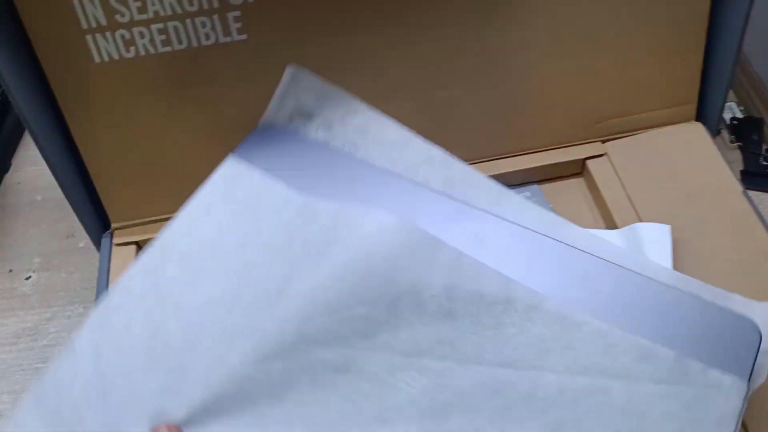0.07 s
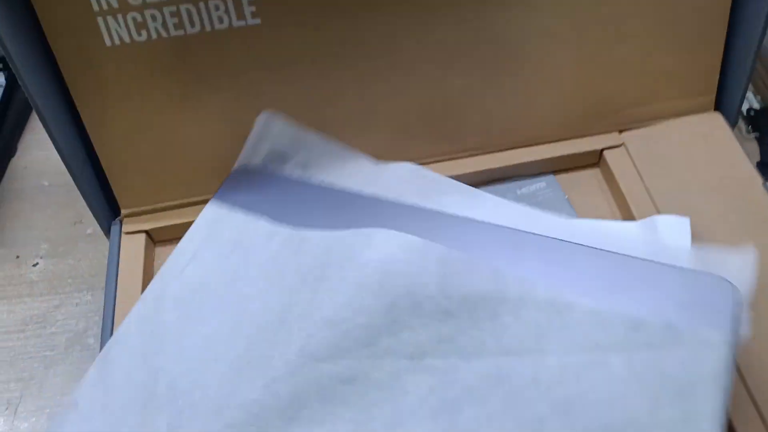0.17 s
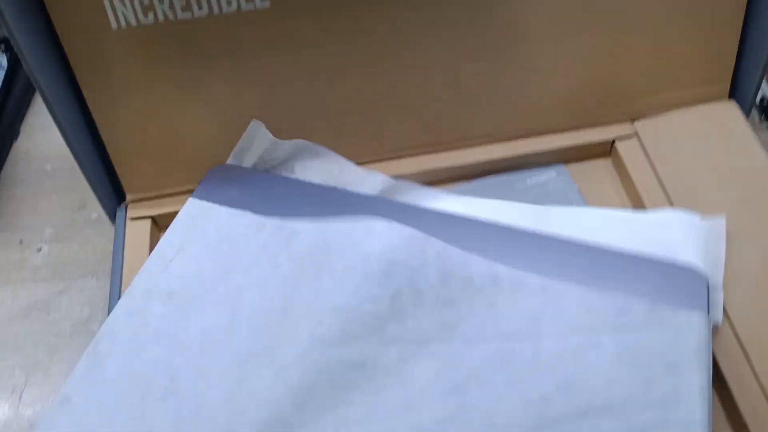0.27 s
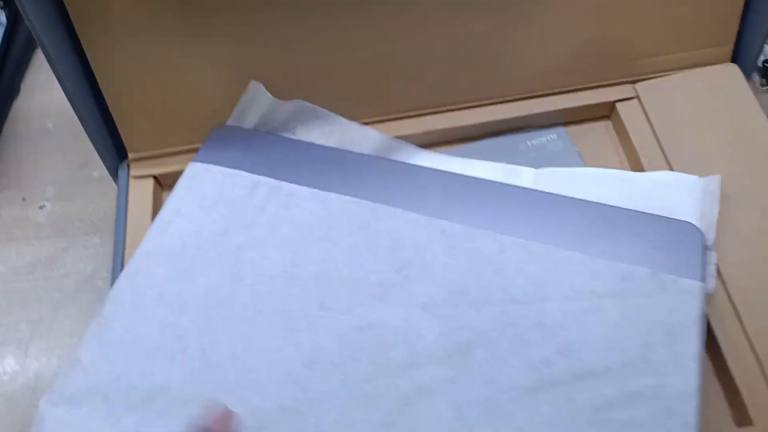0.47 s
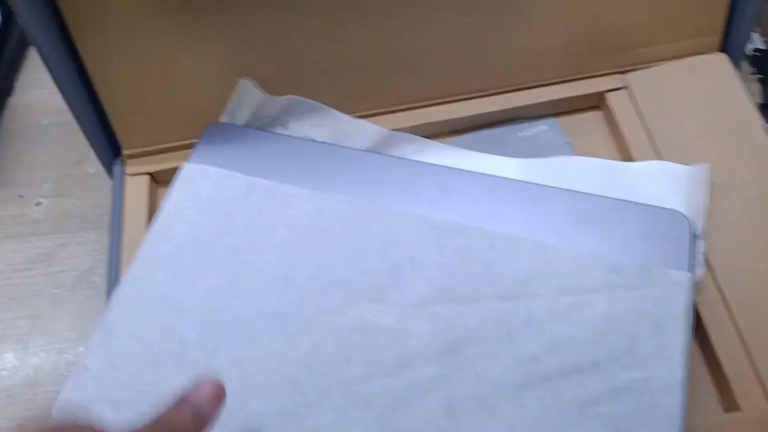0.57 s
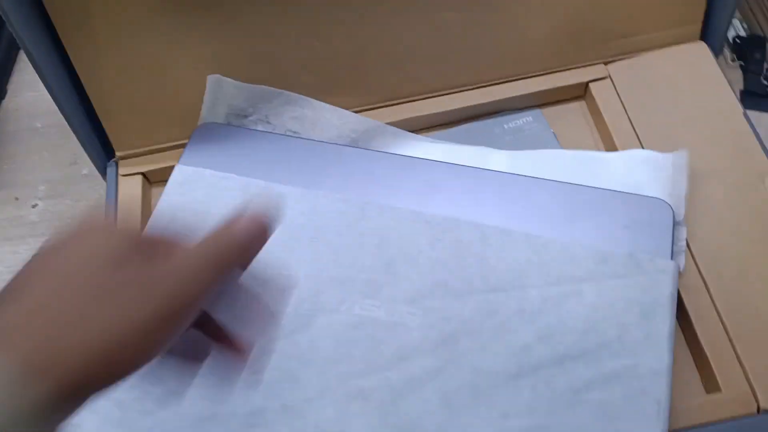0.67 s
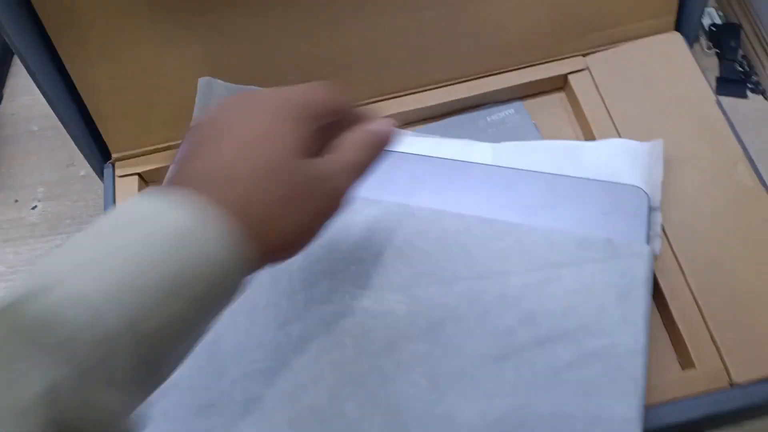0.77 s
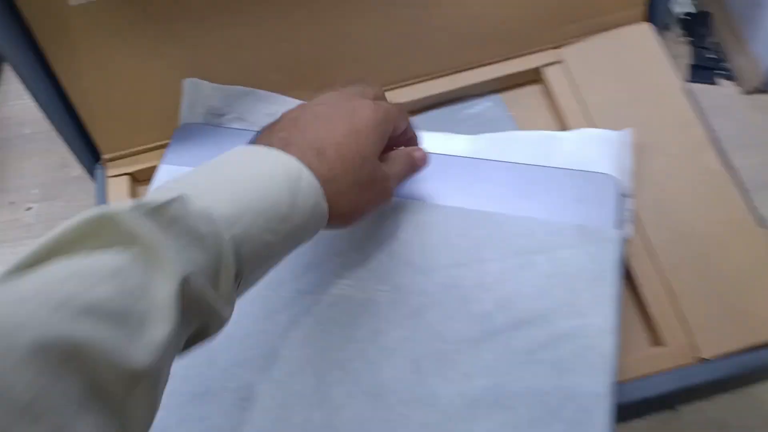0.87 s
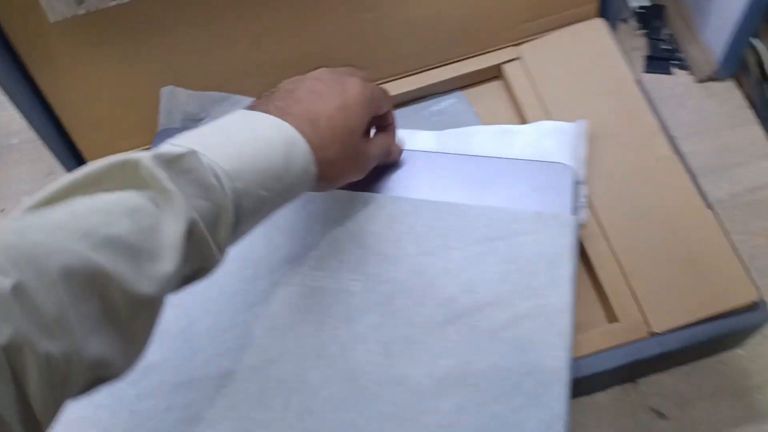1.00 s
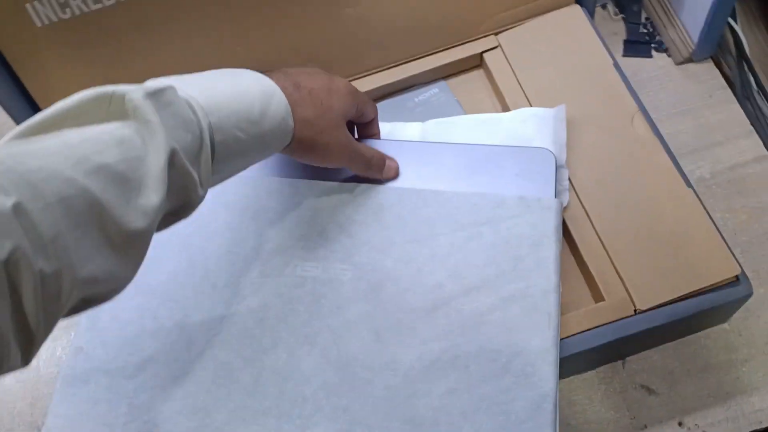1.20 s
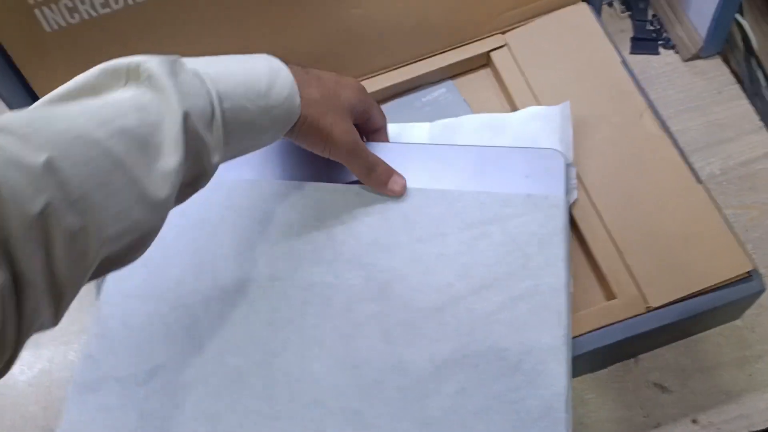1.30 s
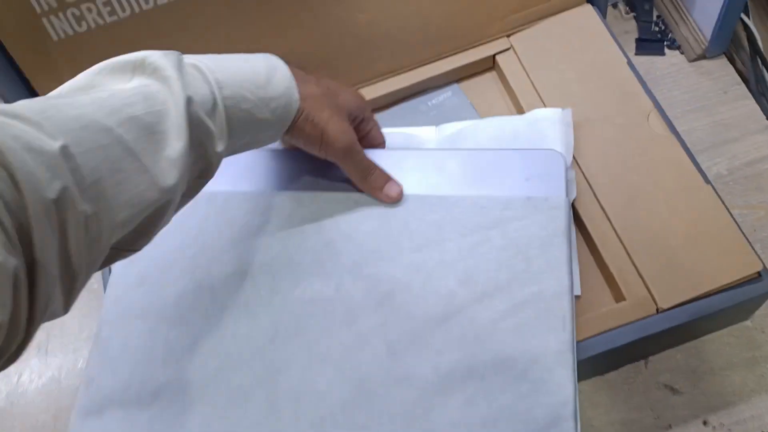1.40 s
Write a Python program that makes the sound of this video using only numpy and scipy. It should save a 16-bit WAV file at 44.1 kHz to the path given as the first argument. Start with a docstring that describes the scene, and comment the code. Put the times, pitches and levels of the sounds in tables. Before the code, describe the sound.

A laptop in a fabric sleeve bumps softly into its cardboard box, close by in a small room. A quick knock comes first, then hollow bumps and brief scuffs, a low thud and a last light tap.

```python
"""Faint bumps and a soft scuff come first, over the steady noise of a small room: close by, a laptop
in a fabric sleeve is being lowered into its cardboard box on a wooden table. Its edge knocks twice,
it bumps and taps the hollow tray, and it settles with a low thud as the box takes its weight.
The sleeve scuffs along the cardboard, with one tiny tick in between. Then a hand takes hold of it."""
import sys
import numpy as np
from scipy import signal
from scipy.fft import rfft, irfft, next_fast_len
from scipy.io import wavfile

SR = 44100
rng = np.random.default_rng(int(sys.argv[2]) if len(sys.argv) > 2 else 0)


def to_wav(s):
    """Save 16-bit WAV."""
    ch = np.atleast_2d(s).T  # columns
    pcm = np.round(np.clip(ch, -1, 1) * 32767)  # PCM
    wavfile.write(sys.argv[1], SR, pcm.astype(np.int16))


N = 63945


def from_db(db):
    """Turn decibels into a number to multiply a sound by."""
    return 10 ** (np.asarray(db) / 20)


def normalise(x):
    """Scale a sound so that its average strength (rms) is 1."""
    return x / np.sqrt(np.mean(x ** 2))


def since(start):
    """Seconds since the start, zero before it."""
    return np.maximum(np.arange(N) / SR - start, 0)


def fade(age, fade_s):
    """Die away by 60 dB in the fade time, fade_s."""
    return np.exp(-np.log(1000) * age / fade_s)


def shape_tone(x, points, tilt_db=0):
    """Filter a sound through (Hz, dB) points; a tilt above zero makes it brighter."""
    size = 2 * next_fast_len(N)
    octave = np.log2(np.maximum(np.fft.rfftfreq(size, 1 / SR), 20))
    hz, db = np.array(points, float).T
    point_octaves = np.log2(hz)
    slope_db = tilt_db * np.maximum(octave - point_octaves[0], 0)
    gain = from_db(np.interp(octave, point_octaves, db) + slope_db)
    # Fold the filter forward in time, so nothing rings before the sound begins.
    cepstrum = irfft(np.log(gain))
    cepstrum[1:size // 2] *= 2
    cepstrum[size // 2 + 1:] = 0
    return irfft(rfft(x, size) * np.exp(rfft(cepstrum)))[:N]


def low_cut(x, hz):
    """Turn down the bass below hz."""
    return signal.sosfilt(signal.butter(2, hz, "high", fs=SR, output="sos"), x)


def ring(start, hz, fade_s, rise_s):
    """One tone that builds up while two things touch, then dies away."""
    age = since(start)
    build_up = 1 - np.exp(-(age / rise_s) ** 2)
    return np.sin(2 * np.pi * hz * age) * fade(age, fade_s) * build_up


# The room noise from bass to treble (frequency [Hz], relative level [dB])
ROOM_NOISE_TONE = [(15, -37), (25, -4), (69, -9), (101, -2.5), (169, -9.5), (204, -17.5), (240, -3.5),
                   (389, -6.5), (537, -4.5), (722, -13), (804, -12), (1530, -18), (2770, -12.5),
                   (4620, -26), (5580, -23), (6730, -31), (10900, -32), (15500, -44)]
ROOM_NOISE_DB = -51.5

def room_noise():
    """A quiet, steady rush, strongest in the bass."""
    return from_db(ROOM_NOISE_DB) * normalise(shape_tone(rng.standard_normal(N), ROOM_NOISE_TONE))


# Soft bumps on the tray (time [s], level [dB], base pitch [Hz], base fade time [s])
BUMPS = [(0.076, -43, 423, 0.031), (.191, -44, 502, 0.052), (0.3, -16, 403.5, 0.031),
         (0.3211, -41.5, 340, 0.087), (.414, -27.5, 470, 0.034), (.453, -46, 275, 0.037),
         (0.513, -40, 342, 0.11), (.584, -17.5, 390, 0.012), (.5895, -15, 481, 0.028),
         (0.5938, -27, 315, 0.023), (.6148, -29, 417, .035), (0.631, -32.5, 314, 0.033),
         (.648, -27.5, 577, .03), (.659, -30, 319, 0.041), (.8843, -29.5, 589, 0.026),
         (.889, -43.5, 254, 0.036), (1.006, -45, 344, 0.054), (1.129, -49, 239, 0.11),
         (1.221, -42.5, 534, 0.063), (1.296, -51, 264, 0.19), (1.359, -48.5, 260, 0.058)]
# The tones in each bump (pitch [times base], added level [dB], fade time [times base])
TRAY_TONES = [(.4, -15.5, 2.64), (.77, -4, 1.25), (1.0, 5, 0.78), (1.3, -17.5, 1.64), (2.2, -17, 0.68)]

def tray_bumps():
    """Padded bumps make the hollow tray ring; the pitch depends on where it is touched."""
    return sum(from_db(db + tone_db) * ring(start, hz * ratio, fade_s * stretch, rise_s=0.0018)
               for start, db, hz, fade_s in BUMPS
               for ratio, tone_db, stretch in TRAY_TONES)


# Slides of the sleeve (time [s], level [dB], rise time [s], fade time [s], tilt [dB per octave])
SCUFFS = [(.11, -63.5, 0.13, 0.23, 4.5), (0.2437, -43.5, 0.0016, 0.081, -.5),
          (0.2969, -37.5, 0.0031, 0.068, 1.6), (.318, -51, 0.003, 0.036, 3.5),
          (0.512, -49, 0.0019, 0.083, 0), (0.58, -37, 0.017, 0.082, -0.95), (0.616, -57, 0.005, 0.059, -3),
          (0.64, -45.5, 0.0034, 0.051, -2), (0.8838, -43.5, 0.0012, 0.029, 2.6)]
# A scuff from bass to treble, before its tilt (frequency [Hz], relative level [dB])
SCUFF_TONE = [(150, -12), (500, 6.5), (1000, 9), (1500, 1), (2400, 5.5), (5500, -4), (7500, -9.5),
              (11000, -17.5), (15500, -18)]
SLIPS_PER_S, SLIP_SPREAD_DB = 4500, 2.5

def sleeve_scuffs():
    """Fibres make many tiny slips on the cardboard, swelling and fading with each slide."""
    out = np.zeros(N)
    for start, db, rise_s, fade_s, tilt_db in SCUFFS:
        slips = rng.random(N) < SLIPS_PER_S / SR
        directions = np.sign(rng.standard_normal(N))
        strengths = from_db(SLIP_SPREAD_DB * rng.standard_normal(N))
        rustle = normalise(shape_tone(slips * directions * strengths, SCUFF_TONE, tilt_db))
        swell = np.minimum(since(start) / rise_s, 1) * fade(since(start + rise_s), fade_s)
        out += from_db(db) * swell * rustle
    return out


# Hard knocks of the laptop's edge (time [s], level [dB], pitch [times base], high-tone boost [dB])
KNOCKS = [(0.2481, 0, 0.976, 1.5), (0.2546, -4, 1.129, -18)]
# The low tones in each knock (base pitch [Hz], added level [dB], fade time [s])
KNOCK_LOW_TONES = [(180, 4.5, 0.00832), (293, -8.5, 0.031), (436, 14, 0.0073), (708, -5.5, .009),
                   (992, -20, .017)]
# The high tones in each knock (base pitch [Hz], added level [dB], fade time [s])
KNOCK_HIGH_TONES = [(1900, -31, 0.016), (2410, -20.5, .013), (3290, -29, 0.013)]

def edge_knocks():
    """The edge strikes, then bounces with a duller knock; the small panel gives off little bass."""
    def strike(start, ratio, tones):
        return sum(from_db(db) * ring(start, hz * ratio, fade_s, rise_s=0.0019)
                   for hz, db, fade_s in tones)
    out = np.zeros(N)
    for start, db, ratio, high_db in KNOCKS:
        low = strike(start, ratio, KNOCK_LOW_TONES)
        high = from_db(high_db) * strike(start, ratio, KNOCK_HIGH_TONES)
        out += from_db(db) * (low + high)
    return low_cut(out, hz=115)


# Low thuds of the whole box (time [s], level [dB], pitch [Hz], fade time [s])
THUDS = [(0.301, -45.5, 58.6, 0.23), (0.603, -17, 75, 0.043), (0.627, -39, 83, 0.12),
         (0.671, -30, 53.3, 0.11), (0.744, -48, 60, 0.17), (0.895, -44, 55.4, 0.13)]

def box_thuds():
    """The box swings slowly a few times as it takes the weight."""
    return sum(from_db(db) * ring(start, hz, fade_s, rise_s=0.0031) for start, db, hz, fade_s in THUDS)


# The tick from bass to treble (frequency [Hz], relative level [dB])
TICK_TONE = [(300, -9), (1000, 7), (3000, 0), (5800, -4), (7300, -22), (10500, -0.5), (16000, -7.5)]
TICK_START_S, TICK_DB = 0.39, -31

def tick():
    """A dry, bright snap about a millisecond long."""
    age = since(TICK_START_S)
    hiss = normalise(shape_tone(rng.standard_normal(N), TICK_TONE))
    return from_db(TICK_DB) * (age > 0) * fade(age, fade_s=0.004) * hiss


# Light taps on cardboard (time [s], level [dB], pitch [Hz])
TAPS = [(0.48, -45.5, 1240), (0.5145, -41.5, 1220), (0.595, -37.5, 978), (0.646, -40, 1070),
        (0.884, -42, 1390)]

def cardboard_taps():
    """Each light touch makes a stiff cardboard edge ring with one short tone."""
    return sum(from_db(db) * ring(start, hz, fade_s=0.037, rise_s=0.00092) for start, db, hz in TAPS)


def room_echo(x):
    """The walls of a small furnished room send the sound back as a short blur."""
    age = since(0.0079)  # the first echo takes this long to return
    tail = rng.standard_normal(N) * fade(age, fade_s=0.32) * (age > 0)
    return signal.fftconvolve(x, tail / np.sqrt(np.sum(tail ** 2)))[:N]


def scene():
    """Add all the sounds into one channel; the edge, tray and sleeve also echo."""
    tray = tray_bumps() + cardboard_taps()
    sleeve = sleeve_scuffs()
    edge = edge_knocks()
    echo = room_echo(from_db(-9) * tray + from_db(-7) * sleeve + from_db(-27) * edge)
    return (tray + sleeve + edge + box_thuds() + tick() + echo + room_noise())[None]


def record(dry):
    """Take away the deepest rumble and the highest treble."""
    bottom_hz, top_hz = 34.5, 15800
    treble_cut = signal.ellip(10, .2, 80, top_hz, fs=SR, output="sos")
    return signal.sosfilt(treble_cut, low_cut(dry, bottom_hz))


dry = scene()
out = record(dry)
to_wav(out)
```